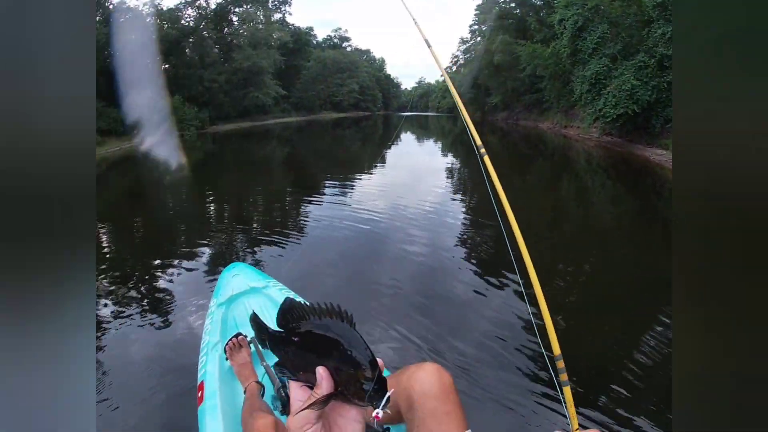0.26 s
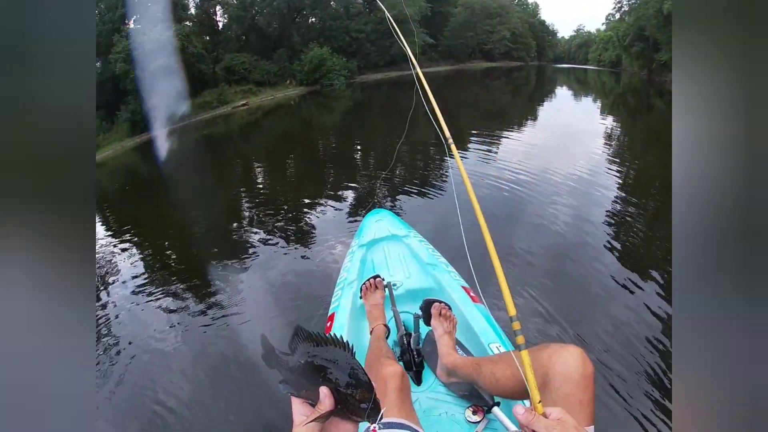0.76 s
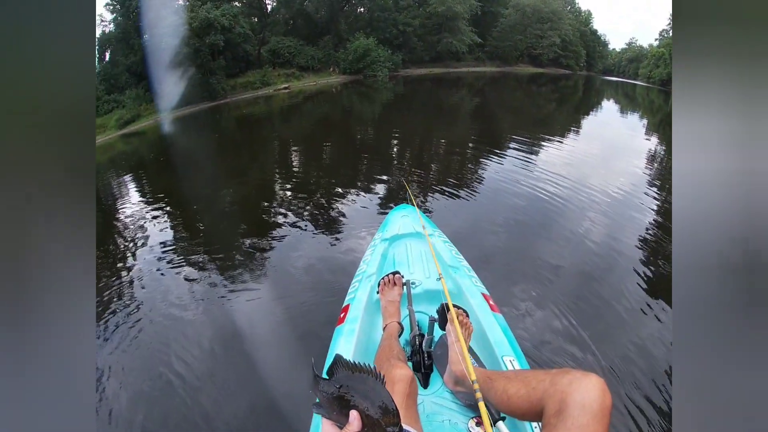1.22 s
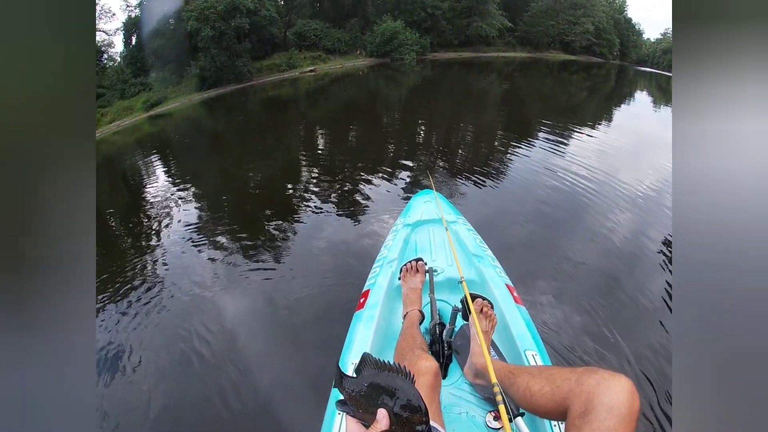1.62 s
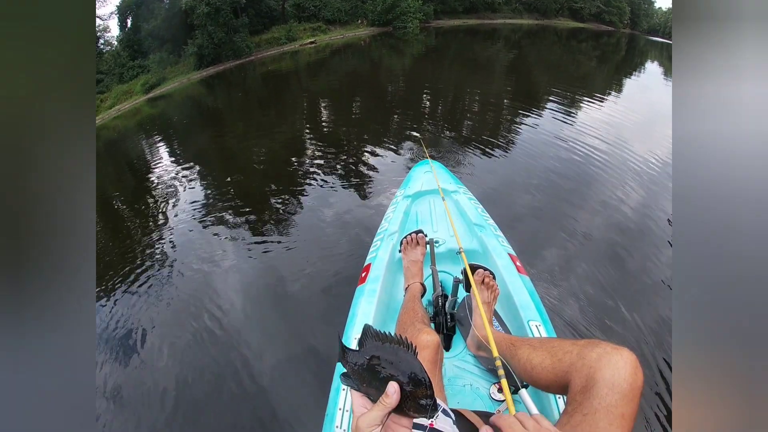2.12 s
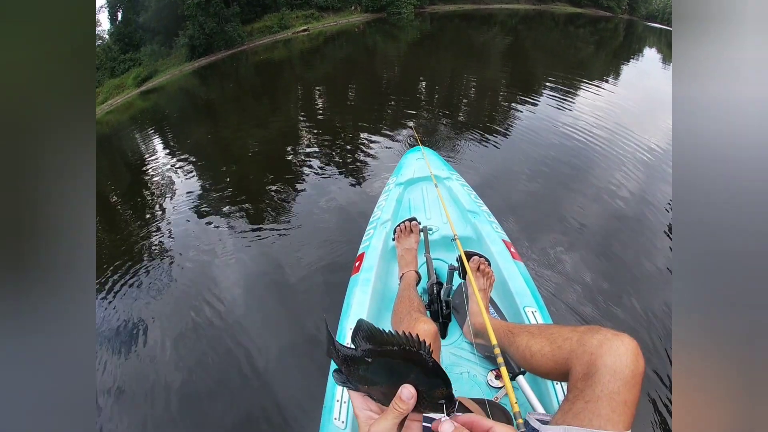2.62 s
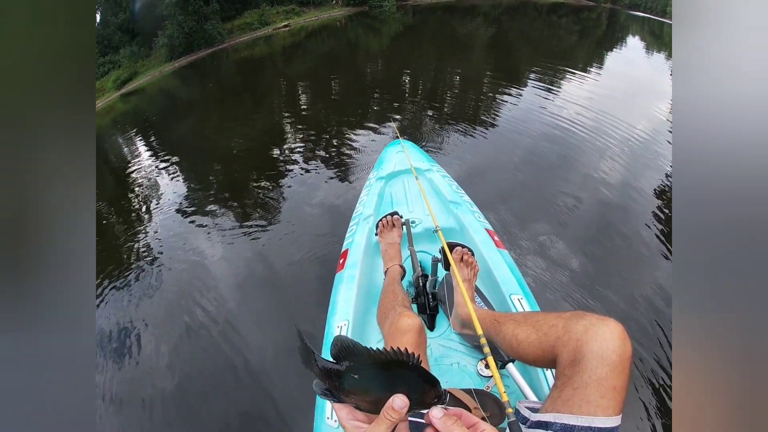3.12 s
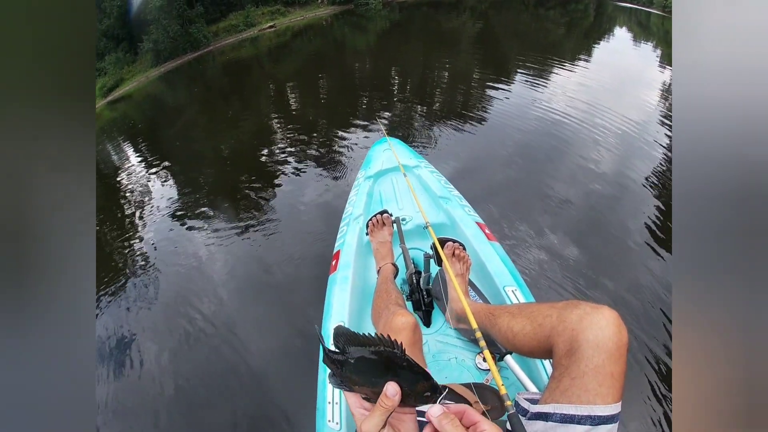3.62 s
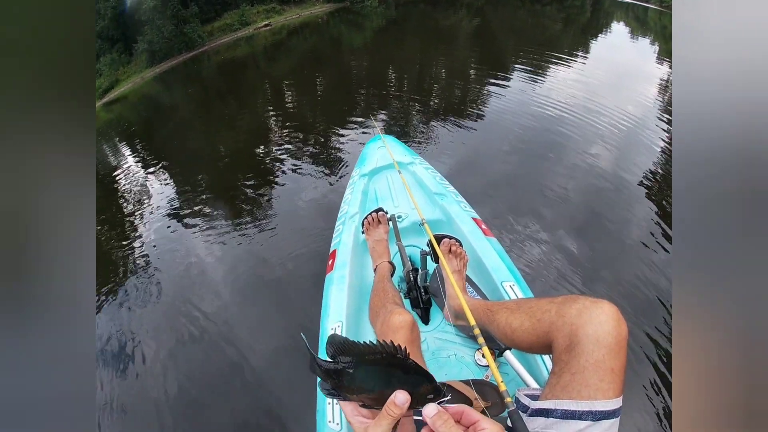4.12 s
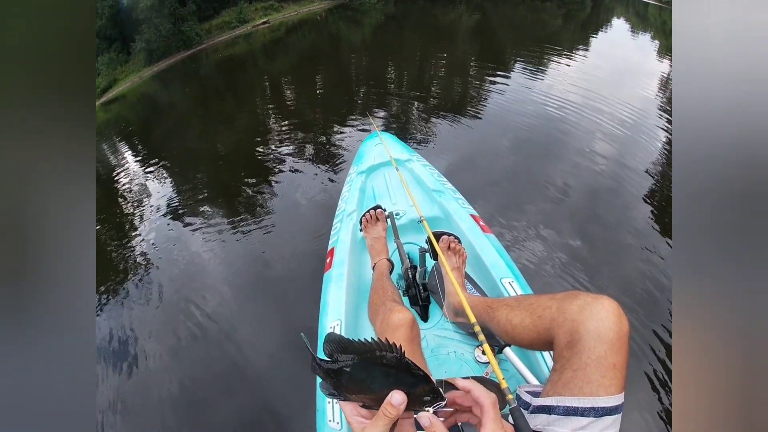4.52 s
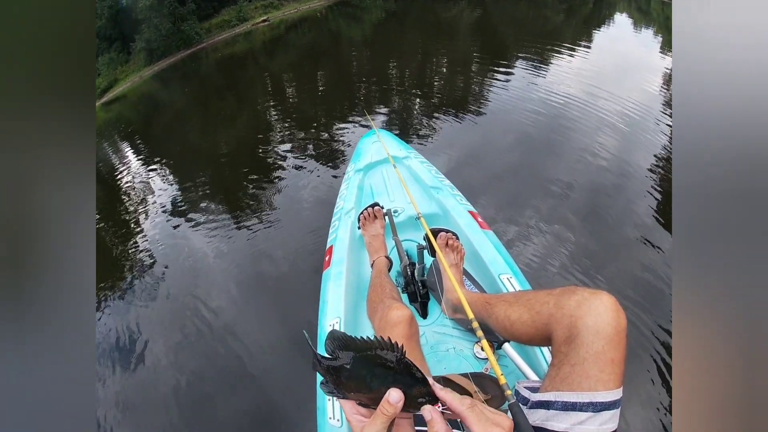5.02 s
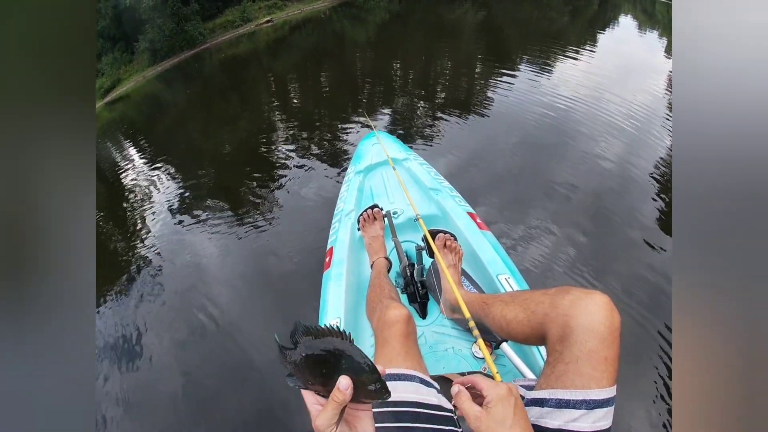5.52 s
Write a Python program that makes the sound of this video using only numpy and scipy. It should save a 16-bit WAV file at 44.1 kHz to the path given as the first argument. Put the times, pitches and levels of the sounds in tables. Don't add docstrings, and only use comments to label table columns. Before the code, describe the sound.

Close handling sounds on a drifting kayak stand out against a dense, high insect chorus. A small tick at 0.65 seconds and a dull knock at 0.8 precede two hard, bright rod-and-reel cracks with a short hollow boom, then a few weaker taps. Insects continue, the near cicada buzz growing, until a small metallic click late on. Single head-worn microphone, dry open air, slight wind rumble.

```python
import sys
import numpy as np
from scipy import signal
from scipy.fft import rfft, irfft
from scipy.io import wavfile
from scipy.ndimage import uniform_filter1d

SR = 44100
rng = np.random.default_rng(int(sys.argv[2]) if len(sys.argv) > 2 else 0)


def log_audio(samples):
    frames = np.atleast_2d(samples).T
    limited = np.clip(frames, -1, 1)
    pcm = np.round(limited * 32767).astype(np.int16)
    wavfile.write(sys.argv[1], SR, pcm)


def gain_from_db(level_db):
    decades = np.asarray(level_db, float) / 20
    return 10 ** decades


N = 253822


def curves(rows):
    s, *columns = np.transpose(rows)
    return [np.interp(np.arange(N) / SR, s, c) for c in columns]


def unit(x):
    return x / np.sqrt(np.mean(x ** 2))


def ring(x, hz, width_hz):
    return signal.lfilter(*signal.iirpeak(hz, hz / width_hz, SR), x)


def band(lo_hz, hi_hz):
    sos = signal.butter(3, [lo_hz, hi_hz], "band", fs=SR, output="sos")
    return unit(signal.sosfilt(sos, rng.standard_normal(N)))


def shaped(points, lo_hz=0, hi_hz=30000):
    hz = np.arange(N // 2 + 1) * SR / N + 1
    point_hz, point_db = np.transpose(points)
    colour = gain_from_db(np.interp(np.log(hz), np.log(point_hz), point_db))
    rise = np.clip((hz - lo_hz) / 300 + 0.5, 0, 1)
    fall = np.clip((hi_hz - hz) / 300 + 0.5, 0, 1)
    share = np.sqrt(rise) * np.sqrt(fall)
    return unit(irfft(rfft(rng.standard_normal(N)) * colour * share, N))


def walk(rate_hz):
    k = int(SR / rate_hz)
    held = np.repeat(rng.standard_normal(N // k + 1), k)
    return 1.29 * uniform_filter1d(uniform_filter1d(held, k), k)[:N]


def strokes(turns, sharp):
    return np.exp(sharp * (np.cos(2 * np.pi * turns) - 1))


# pitch_hz, density_db_per_hz
CHORUS_SPECTRUM = [(210, -70), (350, -22), (564, -25), (746, -18), (1020, -26), (1590, -25.5),
                   (2390, -13.5), (3210, -7.5), (4130, -7), (4820, -2), (5870, -3), (6660, -9),
                   (7990, -3.5), (9450, -13.5), (10000, -33), (13000, -54), (22000, -120)]
# pitch_hz, density_db_per_hz
TREBLE_SPECTRUM = [(9700, -5), (10050, -0.5), (10500, -8), (12000, -12.5), (13100, -12), (13500, -19),
                   (14000, -19), (14200, -26), (14650, -11), (15150, -18), (15400, -17)]
# start_s, low_db, middle_db, high_db
HEAD_TURN = [(0.0, -55, -51.5, -58.5), (0.37, -54.5, -51, -55.5), (0.83, -53.5, -49, -53.5),
             (1.25, -54.5, -51.5, -53.5), (1.47, -53.5, -54.5, -52), (1.67, -55, -55.5, -54),
             (2.04, -56.5, -56.5, -53), (2.32, -55, -56, -53), (2.72, -55.5, -55.5, -52.5),
             (3.14, -56, -56, -52), (3.48, -54.5, -54, -52), (3.78, -54.5, -54, -52),
             (4.58, -55.5, -54, -52), (5.76, -55, -55.5, -51)]


def chorus(flicker_db=0.73):
    low_db, mid_db, high_db = curves(HEAD_TURN)
    # lo_hz, hi_hz, level_db
    groups = [(200, 1850, -73), (1950, 5030, 2 + low_db), (5015, 7150, mid_db), (7180, 9970, 0.19 + high_db)]
    out = gain_from_db(-75 + 0.48 * walk(15)) * shaped(TREBLE_SPECTRUM, lo_hz=9860)
    for lo_hz, hi_hz, db in groups:
        out += gain_from_db(db + flicker_db * walk(12)) * shaped(CHORUS_SPECTRUM, lo_hz, hi_hz)
    return out


# wing_hz, width_hz, stroke_rate_hz, stroke_sharpness, level_db
TRILL_SINGERS = [
    (8000, 160, 69.5, 1.5, -59),
    (7900, 300, 84.5, 1.5, -62),
    (5800, 1000, 12.3, 14, -69),
    (3200, 900, 12.3, 1.5, -64),
]


def trills():
    t = np.arange(N) / SR
    out = np.zeros(N)
    for hz, width_hz, rate_hz, sharp, db in TRILL_SINGERS:
        scrape = ring(ring(rng.standard_normal(N), hz, width_hz), hz, width_hz)
        song = strokes(rate_hz * t + 0.11 * walk(3), sharp) * scrape
        out += gain_from_db(db + 1.1 * walk(1.75)) * unit(song)
    return out


def cicada(rate, db, body, uneven=0.16, scatter_db=3.0):
    rate_hz = curves(rate)[0] * (1 + 0.0007 * walk(10))
    turns = np.cumsum(rate_hz) / SR + 0.005 * walk(200)
    side = 1 + uneven * np.cos(np.pi * turns)
    clicks = strokes(turns, 1000) * side * gain_from_db(scatter_db * walk(240))
    buzz = sum(gain_from_db(gain_db) * ring(ring(clicks, hz, w), hz, w) for hz, w, gain_db in body)
    return gain_from_db(db + 2.7 * walk(2.87)) * unit(buzz)


# start_s, click_rate_hz
FIRST_RATE = [(0, 282), (1, 284.5), (1.6, 284.8), (2.1, 287), (2.75, 289), (3.2, 291.5), (3.3, 285.5),
              (3.75, 288.7), (4.25, 291), (4.75, 292.3), (5.4, 294.5), (5.76, 294.3)]
# start_s, click_rate_hz
SECOND_RATE = [(0, 248), (1.9, 253), (2.4, 257), (3.6, 262), (4.3, 266), (4.6, 266.6), (5.76, 267.3)]
# pitch_hz, width_hz, gain_db
FIRST_BODY = [(4450, 450, 3), (8950, 700, 0)]
# pitch_hz, width_hz, gain_db
SECOND_BODY = [(4740, 140, 18.5), (8800, 810, -34)]
# start_s, first_db, second_db
BUZZ_LEVELS = [(0, -64, -75), (1, -60.5, -73), (2, -57.5, -73), (2.7, -57, -64), (3.2, -58, -72),
               (3.7, -61.5, -67), (4.4, -60, -59), (4.9, -58.5, -65), (5.2, -55, -62), (5.76, -57.5, -65)]


def near_cicadas():
    first_db, second_db = curves(BUZZ_LEVELS)
    return cicada(FIRST_RATE, first_db, FIRST_BODY) + cicada(SECOND_RATE, second_db, SECOND_BODY)


# start_s, wind_db, gust_thud_db, road_db
BASS_LEVELS = [(0.0, -65, -66, -71), (0.13, -60.5, -69.5, -71), (0.26, -58, -71, -67.5),
               (0.46, -53.5, -70, -69.5), (0.61, -56.5, -67, -64.5), (0.77, -64, -69, -66),
               (0.99, -51, -61.5, -59), (1.06, -56.5, -73, -68.5), (1.19, -65, -77, -65),
               (1.27, -69, -82, -74), (1.43, -69, -78, -52.5), (1.54, -58, -67, -66),
               (1.6, -60, -83, -45.5), (1.75, -69, -76, -65), (1.89, -80, -87, -56), (1.99, -69, -74, -58),
               (2.1, -67, -81, -63.5), (2.18, -74, -86, -69.5), (2.32, -70, -94, -70),
               (2.52, -89, -81, -67.5), (2.71, -85, -82, -67), (2.88, -80, -94, -66), (3.16, -82, -77, -70),
               (3.29, -77, -84, -67), (3.64, -72, -77, -68.5), (3.75, -66.5, -80, -67.5),
               (3.88, -73, -85, -68), (4.01, -73, -92, -64), (4.1, -79, -89, -65), (4.25, -84, -88, -65.5),
               (4.38, -73, -82, -62), (4.55, -67, -68.5, -65.5), (4.62, -72, -61, -63.5),
               (4.73, -63, -62, -64), (4.83, -65, -64.5, -61.5), (4.94, -71, -81, -63.5),
               (5.15, -77, -68.5, -63), (5.21, -77, -74, -64.5), (5.47, -72, -83, -64.5),
               (5.61, -65, -86, -60.5), (5.76, -83, -86, -65)]


def wind_and_road():
    wind_db, thud_db, road_db = curves(BASS_LEVELS)
    wind = gain_from_db(wind_db + 5.1 + 1.7 * walk(9)) * band(13, 50.2)
    thud = gain_from_db(thud_db + 5.1 + 0.92 * walk(15)) * band(89, 122)
    drone = unit(band(136.7, 205) + 0.37 * band(186, 317.5))
    road = gain_from_db(road_db + 2.3 + 1.5 * walk(10)) * drone
    return wind + thud + road


def blow(rattle_s, loose=0.086):
    t = np.arange(6000) / SR
    grains = rng.standard_normal(6000) * rng.exponential(size=6000)
    chatter = loose * grains * np.exp(-t / max(rattle_s, 1e-4))
    return chatter + (t == 0)


def add(out, start_s, sound, peak_db):
    i = int(start_s * SR)
    out[i:i + len(sound)] += gain_from_db(peak_db) * sound / np.abs(sound).max()


# start_s, peak_db, ring_hz, width_hz, rattle_s
TACKLE_TICKS = [(.083, -50, 1200, 900, 0.0022), (.608, -53, 696, 800, 0.0065),
                (.648, -27.5, 2640, 1600, 0.0034), (.807, -31.5, 250, 71.5, 0.0028),
                (.808, -36.5, 1260, 500, 0.0033), (.845, -47, 890, 1200, 0.0039),
                (.83, -39.5, 200, 90, 0.011), (0.861, -38, 60.3, 40, .004), (.94, -50, 248, 200, 0.011),
                (.929, -43, 800, 352, 0.0048), (1.385, -29, 10400, 1200, .0004),
                (1.385, -42, 13400, 2500, .0003), (1.4113, -44, 10600, 1500, .0004),
                (1.4113, -56, 14000, 1500, .0003), (1.5748, -40, 10400, 1500, .0004),
                (1.5748, -46, 13500, 2500, .0003), (.81, -44, 600, 400, 0.0084),
                (4.27, -61.5, 845, 400, 0.033), (4.945, -49, 900, 1200, 0.0017),
                (1.52, -48.5, 600, 600, .005), (1.716, -46, 507, 510, 0.015),
                (2.379, -55.5, 635, 500, 0.0038), (2.728, -46, 1655, 500, 0.0015),
                (3.919, -55, 700, 250, .003), (3.925, -56.5, 370, 120, .003), (4.33, -59, 950, 400, .03),
                (4.9445, -29.5, 2590, 350, 0.0039), (4.9445, -39, 7100, 700, .001),
                (4.953, -36, 2550, 700, 0.0014), (4.953, -34, 7000, 700, .001)]


def ticks():
    out = np.zeros(N + 8000)
    for s, db, hz, width_hz, rattle_s in TACKLE_TICKS:
        add(out, s, ring(ring(blow(rattle_s), hz, width_hz), hz, 2 * width_hz), db)
    return out[:N]


# middle_s, level_db, wing_hz, length_s
CRICKET_CHIRPS = [(.626, -60, 7160, .1), (1.073, -66, 7300, .1), (1.52, -61, 7230, .08),
                  (1.8, -64, 7240, 0.11), (2.0, -69, 7200, .1), (2.157, -63, 7220, .08),
                  (2.22, -62, 7200, .06), (2.387, -62, 7220, .13), (2.748, -64, 7240, 0.12),
                  (2.85, -63, 7150, 0.092), (3.029, -61, 7230, .14), (3.239, -63, 7060, 0.085),
                  (3.493, -61, 7200, 0.081), (3.7, -71, 7140, 0.087), (3.93, -68, 7260, 0.095),
                  (4.315, -62, 7230, 0.088), (4.537, -64, 7240, .1), (4.762, -64, 7200, 0.11),
                  (5.13, -77, 7200, .1), (5.432, -63, 7200, .1)]


def chirps(rate_hz=48, sharp=1.3, fall_hz=120, waver_hz=30):
    out = np.zeros(N)
    waver = waver_hz * walk(60)
    for s, db, hz, length_s in CRICKET_CHIRPS:
        i = np.arange(int((s - length_s) * SR), int((s + length_s) * SR))
        t = i / SR - s
        pitch_hz = hz + waver[i] - fall_hz * np.sin(2 * np.pi * rate_hz * t)
        tone = np.sin(2 * np.pi * np.cumsum(pitch_hz) / SR)
        swell = np.exp(-(1.9 * t / length_s) ** 4)
        out[i] += gain_from_db(db + 13.5) * swell * strokes(rate_hz * t, sharp) * tone
    return out


# start_s, peak_db, brightness_db, hull_share_db, rattle_s, main_ring_hz
ROD_BLOWS = [(1.292, -45.5, -8, -3.5, 0.0018, 2210), (1.3828, -13, -1, -28, 0.0016, 3300),
             (1.3842, -18, 3, -9.5, 0.0073, 3370), (1.394, -25.5, -14, -14, .004, 3200),
             (1.409, -21, -15, -9.5, 0.0061, 3130), (1.415, -22, -14, -16, 0.0067, 3500),
             (1.4232, -27.5, -14, -12.5, 0.0042, 3130), (1.5726, -16, 0, -20, .002, 3000),
             (1.5742, -19.5, -3, -11, .004, 2960), (1.582, -20, -18, -11, 0.0036, 2600),
             (1.5922, -19, -12, -10.5, 0.0022, 2670), (1.5962, -24, -10, -7, 0.0065, 2980),
             (1.667, -41.5, -8, -2, 0.0035, 2390), (1.797, -40.5, -12, -5, 0.0035, 3100),
             (1.8242, -25, -9, -3, 0.0052, 2660), (1.87, -45.5, -4, 9.5, .008, 2500),
             (1.9449, -34.5, -10, 3.5, 0.004, 2510), (1.9719, -35, -18, 3, 0.0039, 2500),
             (1.9922, -28.5, 2, -3, .004, 2660), (2.008, -26, -1, -5.5, 0.0096, 2600),
             (2.024, -39, -12, -5, 0.0031, 2500), (2.039, -41.5, 1, 4.5, 0.011, 2500)]
# pitch_hz, width_hz, gain_db
ROD_MODES = [(1820, 27, -23), (2160, 9.7, -7), (2375, 11, 0), (2576, 57, 3.5), (3093, 66, 9.5),
             (3520, 100, -1), (3900, 93, -17), (5050, 55, 21), (5300, 45, -13), (5600, 89, -24),
             (7620, 150, -34), (8140, 100, -31)]
# pitch_hz, width_hz, gain_db
HULL_MODES = [(160, 22, -2), (268.3, 15, 3), (399, 91, 1.5), (600, 100, -10), (727, 67, -3), (950, 38, -24),
              (1252, 34, 1.5), (1600, 120, -3)]


def struck(push, modes, touch_db, spread=1.0):
    return [gain_from_db(gain_db + c) * ring(push, hz, spread * w) / np.sqrt(w)
            for (hz, w, gain_db), c in zip(modes, touch_db)]


def clatter(spread=2.76, crack_db=-2, main_db=1, boom_db=-3, boom_s=0.022):
    out = np.zeros(N + 8000)
    for s, db, bright_db, hull_db, rattle_s, hz in ROD_BLOWS:
        push = blow(rattle_s)
        touch_db = 3 * rng.standard_normal(len(ROD_MODES) + len(HULL_MODES))
        rod = struck(push, ROD_MODES, touch_db, spread)
        low = sum(r for r, mode in zip(rod, ROD_MODES) if mode[0] < 4300)
        add(out, s, ring(low, hz, 1760), db + main_db)
        add(out, s, ring(ring(push, hz, 1800), hz, 3300), db + crack_db)
        fizz = ring(ring(push, 5700, 2400), 5700, 2400)
        add(out, s, unit(sum(rod) - low) + 1.05 * unit(fizz), db + bright_db)
        hull = sum(struck(push, HULL_MODES, touch_db[::-1]))
        add(out, s + 0.000985, uniform_filter1d(hull, size=12), db + hull_db)
        boom = ring(ring(blow(boom_s, loose=1.0), 600, 1200), 700, 2200)
        add(out, s + 0.001, boom, db + hull_db + boom_db)
    return out[:N]


def muffle(x, hz=9400):
    return signal.sosfilt(signal.cheby2(5, 24, hz * 1.11, fs=SR, output="sos"), x)


def scene():
    near = muffle(near_cicadas() + clatter())
    mix = near + chorus() + trills() + wind_and_road() + ticks() + chirps()
    return mix[None]


def low_pass(x):
    return signal.sosfilt(signal.butter(12, 15530, fs=SR, output="sos"), x)


def record(dry):
    return low_pass(dry)


dry = scene()
out = record(dry)
log_audio(out)
```